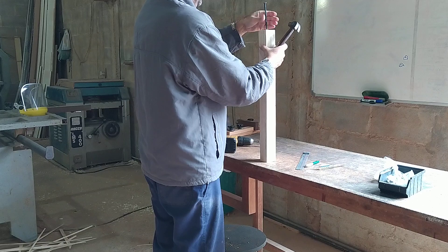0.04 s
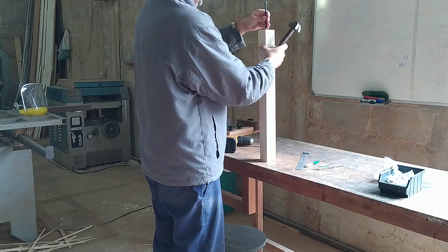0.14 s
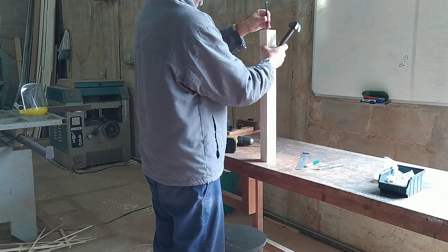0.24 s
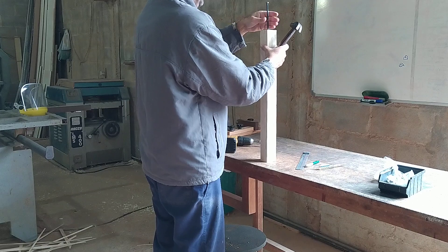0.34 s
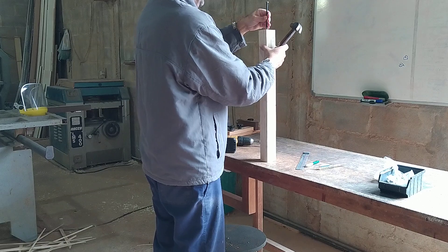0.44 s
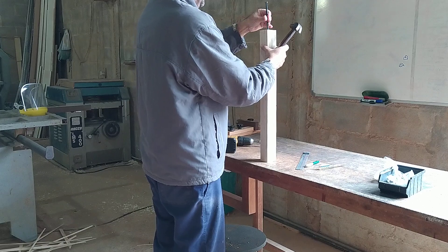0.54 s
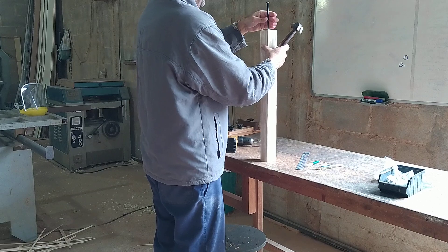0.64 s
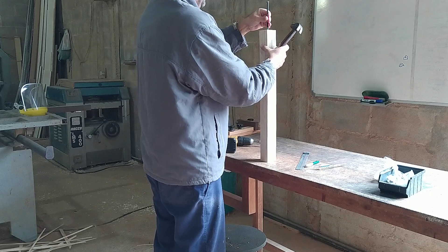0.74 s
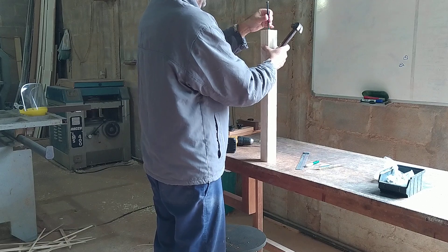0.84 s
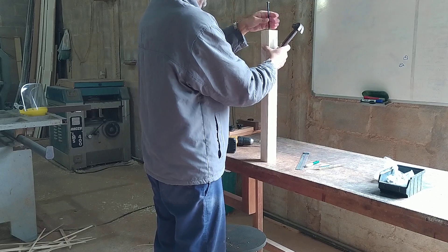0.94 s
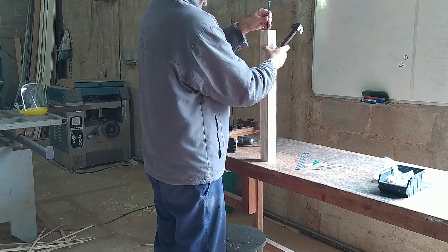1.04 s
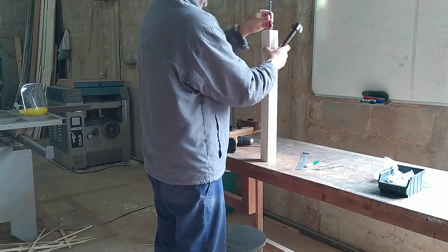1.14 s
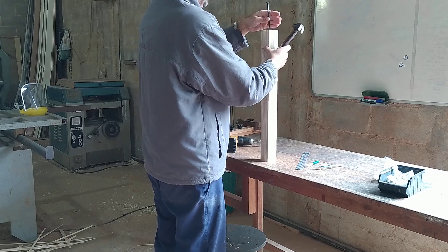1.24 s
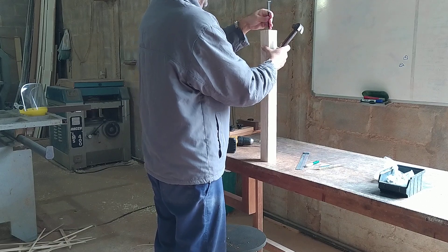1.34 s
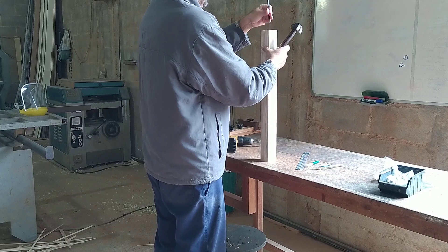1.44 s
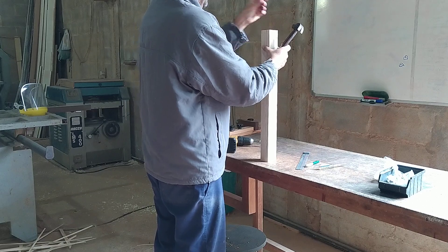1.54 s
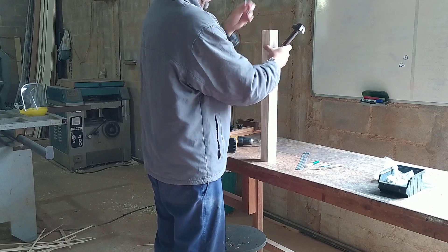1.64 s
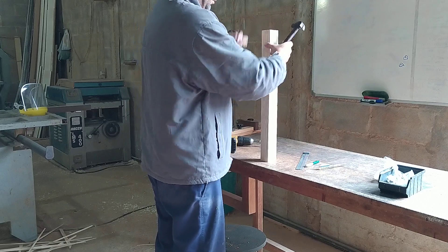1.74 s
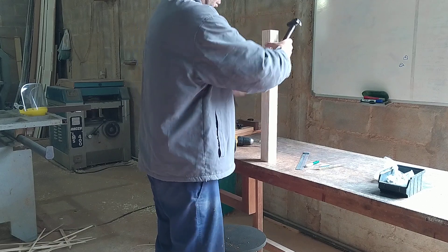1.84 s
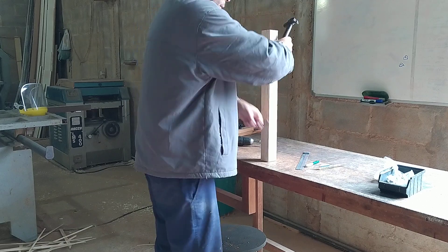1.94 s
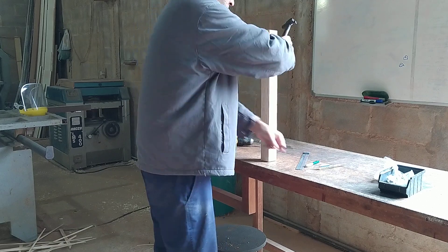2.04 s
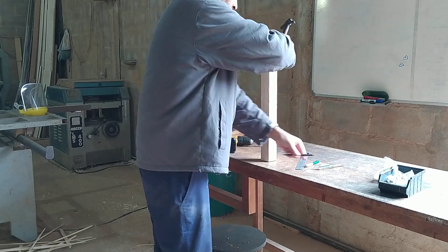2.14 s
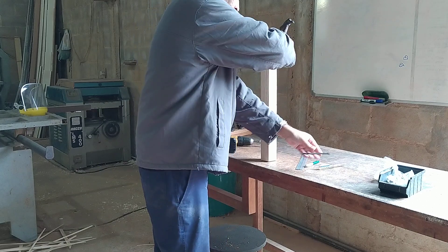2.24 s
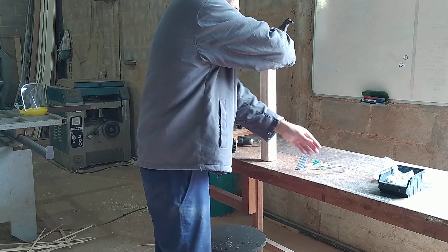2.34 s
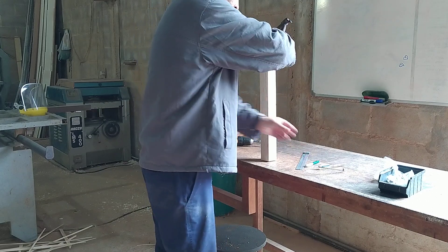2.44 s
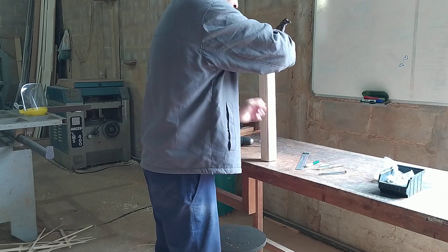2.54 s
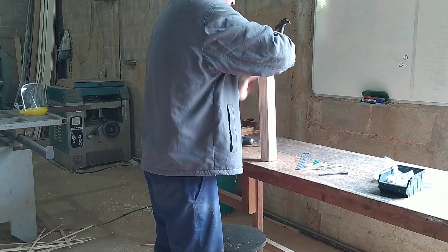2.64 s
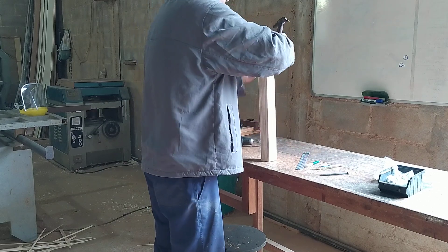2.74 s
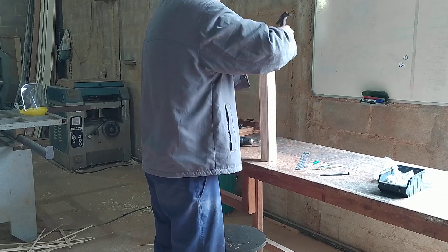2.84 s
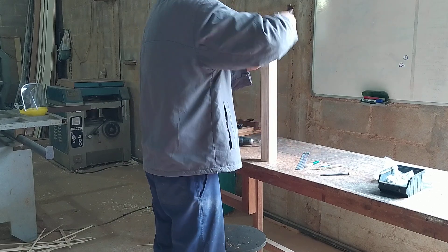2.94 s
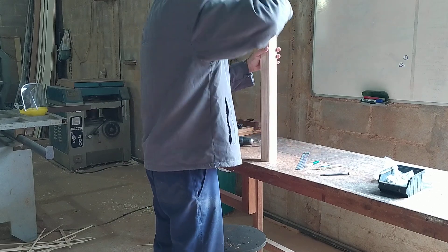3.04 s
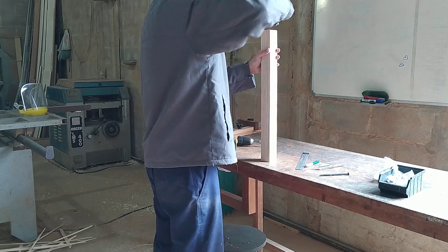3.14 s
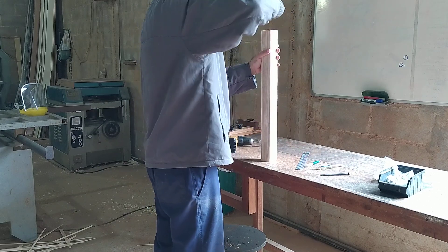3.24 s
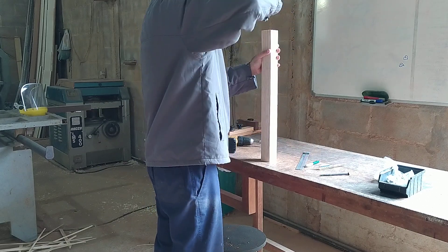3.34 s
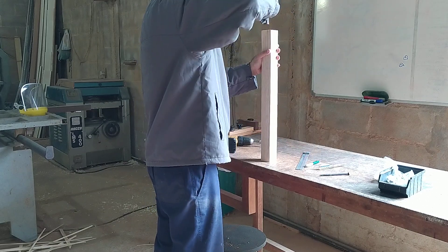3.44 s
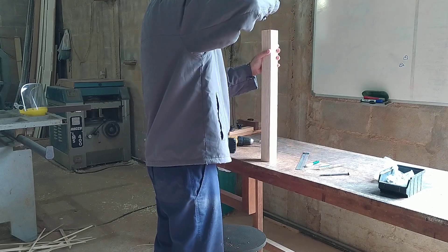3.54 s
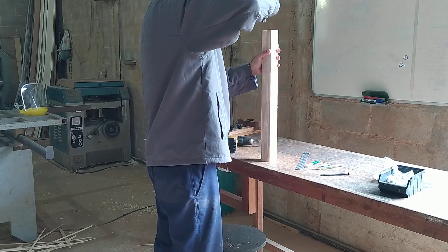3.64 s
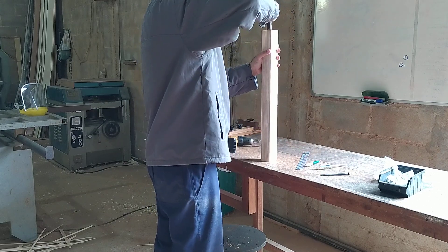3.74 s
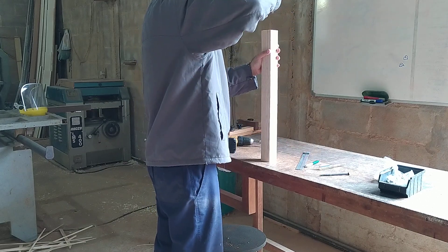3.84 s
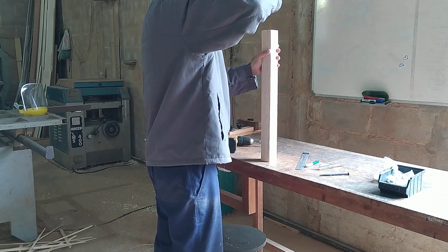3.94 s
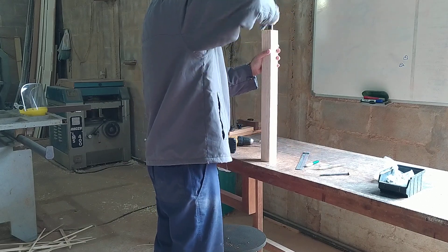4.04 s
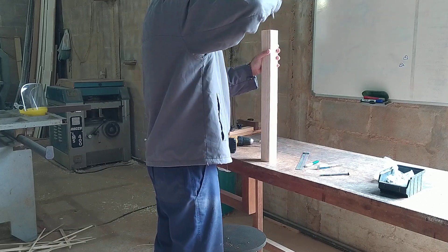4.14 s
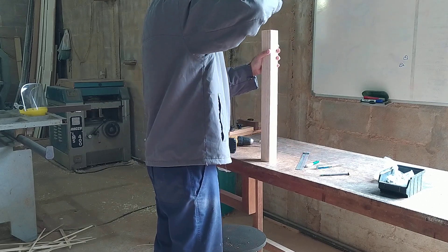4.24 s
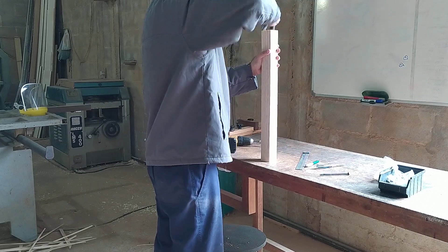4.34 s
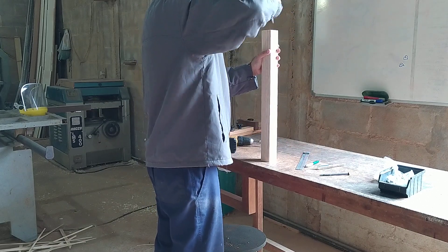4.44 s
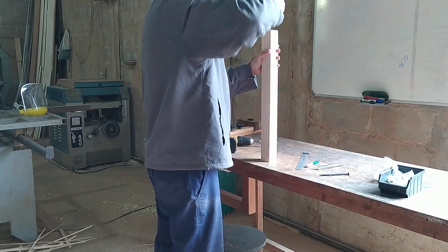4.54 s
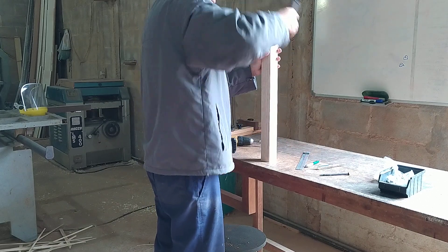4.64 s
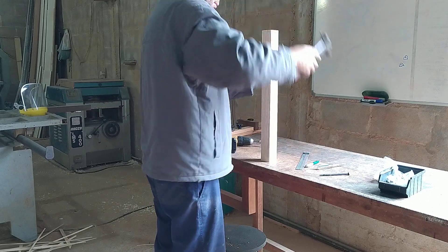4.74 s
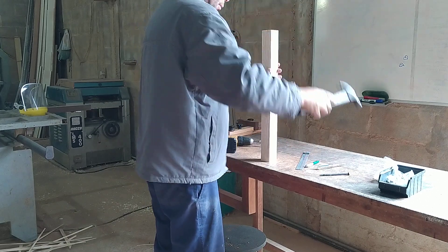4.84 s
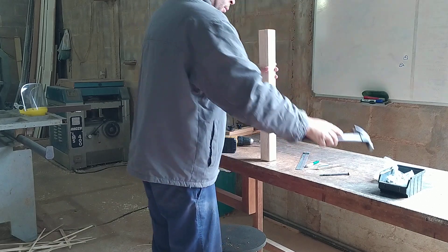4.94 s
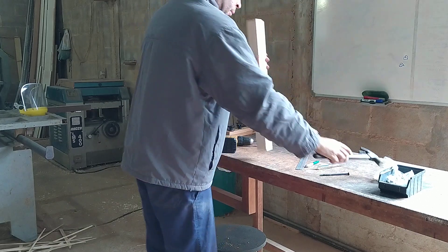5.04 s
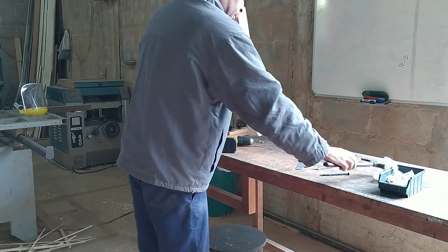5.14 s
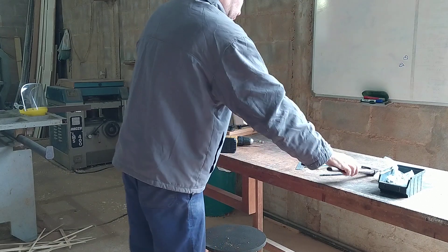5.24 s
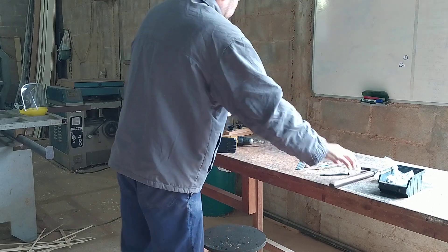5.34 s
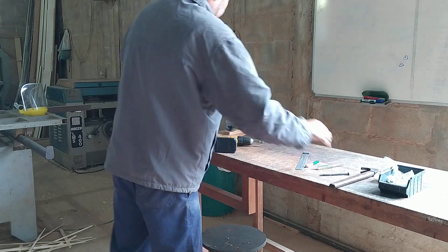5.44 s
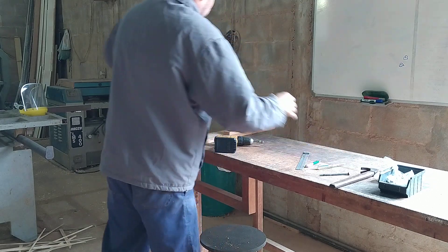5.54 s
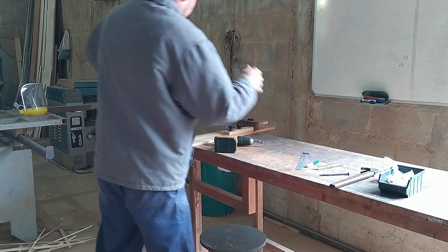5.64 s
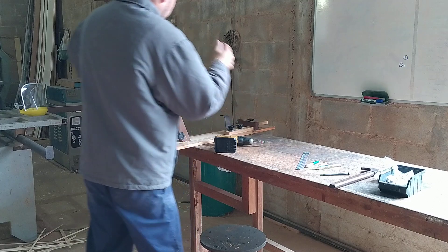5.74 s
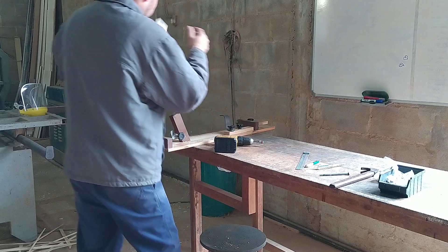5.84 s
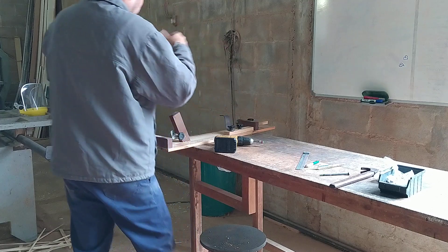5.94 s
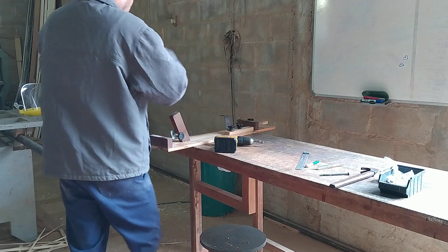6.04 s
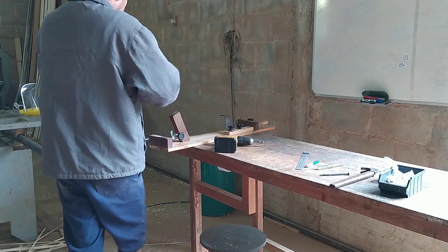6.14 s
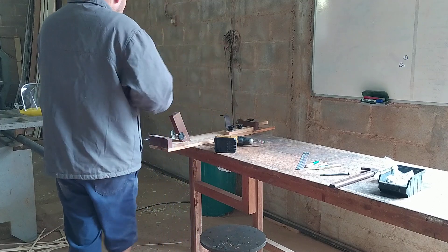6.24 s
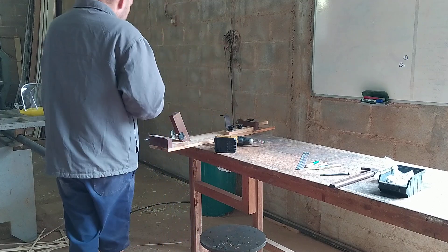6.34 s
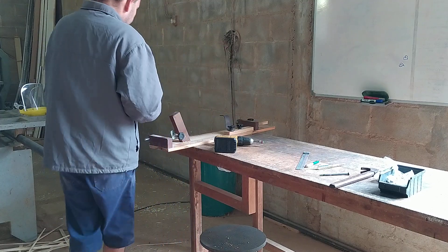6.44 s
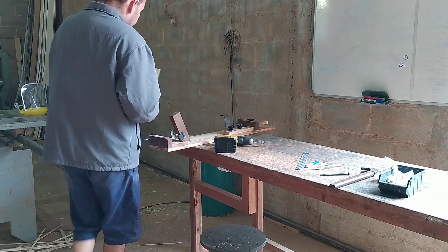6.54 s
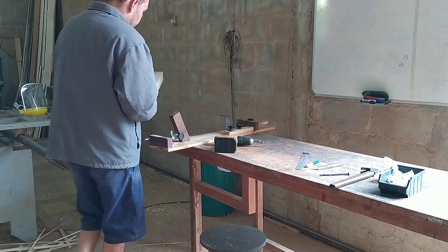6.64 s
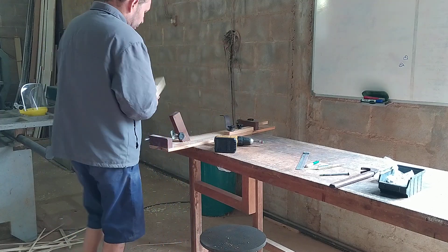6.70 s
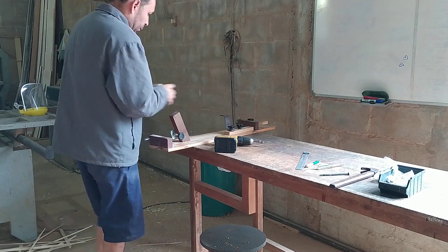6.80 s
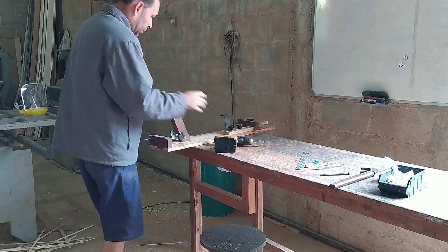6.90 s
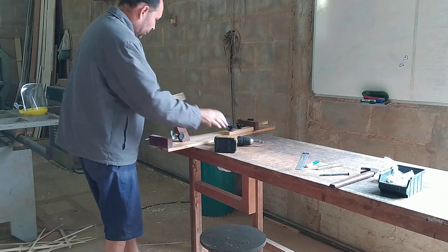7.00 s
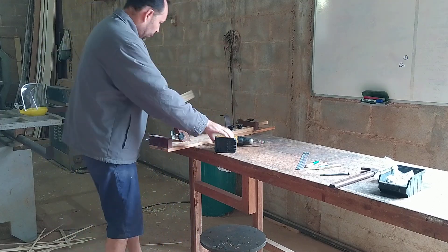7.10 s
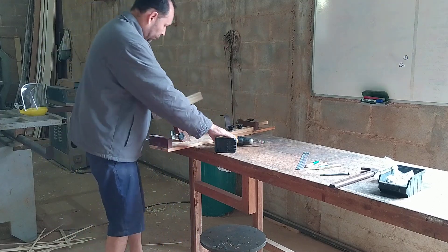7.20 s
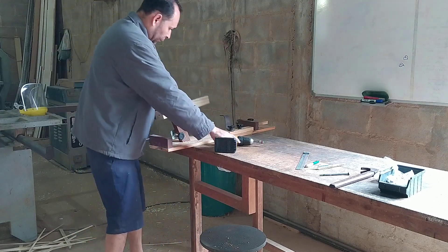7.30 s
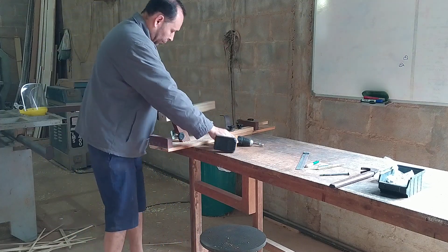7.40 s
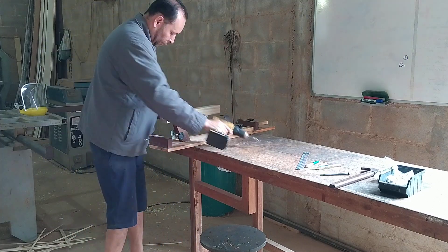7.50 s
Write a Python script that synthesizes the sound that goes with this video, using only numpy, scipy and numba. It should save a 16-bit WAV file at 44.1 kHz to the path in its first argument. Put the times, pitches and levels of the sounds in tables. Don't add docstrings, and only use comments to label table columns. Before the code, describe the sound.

A hard-walled workshop with just over half a second of echo, heard by a phone a few metres away over low town rumble and a distant engine drone. From 0.2 to 1.4 seconds a thin steel point wiggled in wood gives small irregular ticks, with soft jacket rustle at the start. At 2.4 it drops on the bench, bouncing until about 2.65 with a high, shimmering ring. Soft dull knocks follow at 2.9 to 3.2. Three loud hammer blows land at 3.8, 4.1 and 4.4, the first weaker: woody post thuds with bright steel ringing, slightly squashed. The hammer is laid down, handle at 5.3, heavy head at 5.4. Small jacket snaps come at 5.8 and 5.9, then a sharp cloth tug at 6.35. From 5.6 a motorbike outside swells and rises in pitch with hiss until the end. Tools knock at 6.6 and, brighter, 7.5.

```python
import sys
import numpy as np
from scipy import signal
from scipy.fft import rfft, irfft, next_fast_len
from scipy.io import wavfile
from scipy.ndimage import uniform_filter1d, minimum_filter1d
from numba import njit

SR = 44100
rng = np.random.default_rng(int(sys.argv[2]) if len(sys.argv) > 2 else 0)


def amplitude_ratio(level_db):
    exponent = np.asarray(level_db, float) / 20
    return 10 ** exponent


def wav_record(signal):
    frames = np.transpose(np.atleast_2d(signal))
    bounded = np.clip(frames, -1, 1)
    quanta = np.round(bounded * 32767).astype(np.int16)
    wavfile.write(sys.argv[1], SR, quanta)


N = 333717
TIME = np.arange(N) / SR
FAST = next_fast_len(N, real=True)
STREET_LEAD_SAMPLES, BENCH_LEAD_SAMPLES = 19, 10


def on_log(table, hz):
    f, value = np.transpose(table)
    return np.interp(np.log(np.maximum(hz, 1)), np.log(f), value)


def unit(x):
    return x / np.sqrt(np.mean(x ** 2))


def coloured(x, table):
    hz = np.arange(FAST // 2 + 1) * SR / FAST
    return irfft(rfft(x, FAST) * amplitude_ratio(on_log(table, hz)), FAST)[:, :N]


def band(x, hz, width_hz):
    return signal.lfilter(*signal.iirpeak(hz, hz / width_hz, SR), x)


def octave_share(hz, centre_hz):
    return np.clip(1 - np.abs(np.log2(np.maximum(hz, 1) / centre_hz)), 0, 1)


def walk(rate_hz, size=N):
    hold = int(SR / rate_hz)
    steps = np.repeat(rng.standard_normal(size // hold + 1), hold)
    return 1.3 * uniform_filter1d(uniform_filter1d(steps, hold), hold)[:size]


# frequency in Hz, left-right correlation.
PORT_LIKENESS = [(30, 0.5), (70, 0.8), (120, 0.92), (250, 1), (650, 0.95), (1000, 0.262), (4000, 0.076),
                 (10000, 0.081)]


def pair(size):
    n = next_fast_len(size, real=True)
    mid, side = rfft(rng.standard_normal((2, n)))
    like = np.clip(on_log(PORT_LIKENESS, np.arange(n // 2 + 1) * SR / n), 0, 1)
    sign = np.array([[1], [-1]])
    return irfft(np.sqrt(1 + like) * mid + np.sqrt(1 - like) * side * sign, n)[:, :size] / np.sqrt(2)


# frequency in Hz, T60 in seconds.
ROOM_T60 = [(100, 0.634), (400, 0.5232), (1500, 0.558), (4000, 0.3976), (6300, 0.32), (9500, 0.353),
            (14000, 0.4276)]


def room(direct_db, build_s, lead_samples):
    n = 2 ** 15
    t, hz = np.arange(n) / SR, np.arange(n // 2 + 1) * SR / n
    echoes, tail = rfft(pair(n)), 0
    for centre_hz in 62.5 * 2. ** np.arange(9):
        octave = irfft(echoes * octave_share(hz, centre_hz), n)
        tail = tail + octave * amplitude_ratio(-60 * t / on_log(ROOM_T60, centre_hz))
    tail = tail * (1 - np.exp(-t / build_s)) * (1 + 0.614 * np.exp(-t / 0.0096))
    tail = tail / np.sqrt(np.sum(tail ** 2) / 2)
    tail[:, 0] = amplitude_ratio(direct_db)
    tail[1] = np.roll(tail[1], lead_samples)
    return tail


def causal(table):
    n = 2048
    cepstrum = irfft(np.log(amplitude_ratio(on_log(table, np.arange(n // 2 + 1) * SR / n))), n)
    cepstrum[1:n // 2] *= 2
    cepstrum[n // 2 + 1:] = 0
    response = irfft(np.exp(rfft(cepstrum)), n)
    return response / np.sqrt(np.sum(response ** 2))


def hits(events, colour, modes, ring_db, crack_s, gain_db, direct_db, build_s):
    path = room(direct_db, build_s, BENCH_LEAD_SAMPLES)
    out, n = np.zeros((2, N)), 4096
    for s, db, bright_db, pan_db in events:
        crackle = rfft(rng.standard_normal(256) * np.exp(-np.arange(256) / SR / crack_s))
        push = np.pad(irfft(crackle / np.abs(crackle)), (0, n))
        soft = signal.lfilter([.2], [1, -.8], push)
        push = soft + amplitude_ratio(bright_db) * (push - soft)
        push = signal.fftconvolve(push, causal(colour))[:n]
        ring = sum(amplitude_ratio(mode_db) * band(push, hz, width_hz) for hz, width_hz, mode_db in modes)
        body = push + amplitude_ratio(ring_db) * ring
        level = amplitude_ratio(db + gain_db + np.array([[pan_db], [-pan_db]]) / 2)
        heard = signal.fftconvolve(body[None], path, axes=1) * level
        i = int((s - .002) * SR)
        out[:, i:i + heard.shape[1]] += heard[:, :N - i]
    return out


# centre in Hz, width in Hz, level in dB.
SHED_HUMS = [(103.45, 16.3, -67.5), (163.3, 15.5, -65), (273.9, 26.5, -62), (13600, 4000, -81.5)]


def shed():
    air = pair(N)
    out = 0
    for hz, width_hz, db in SHED_HUMS:
        hum = unit(band(band(air, hz, width_hz), hz, width_hz))
        out = out + amplitude_ratio(db + 1.77 * walk(4.3)) * hum
    return out


# time in seconds, pitch in Hz, level in dB.
DRONE = [(0, 56, -55), (.85, 55.83, -54), (1.1, 55.44, -71.5), (1.6, 52.61, -60.5), (2.09, 52.21, -54),
         (2.55, 51.3, -73), (2.8, 50.77, -61), (3.54, 50.62, -43), (3.9, 50.08, -50.5), (4.4, 48.29, -50),
         (4.9, 49.31, -51), (5.7, 48.92, -56), (6.3, 49.37, -57), (6.8, 48.4, -59.5), (7.57, 49.2, -58)]
# multiple of the pitch, level over the drone in dB.
DRONE_WHINE = [(9, -24), (12, -21)]
OCTAVE_DB, OCTAVE_FADE_DB_S = -57, 6


def drone():
    s, *columns = np.transpose(DRONE)
    hz, db = (np.interp(TIME, s, c) for c in columns)
    angle = 2 * np.pi * np.cumsum(hz * (1 + 0.01997 * walk(12))) / SR
    out = np.sqrt(2) * amplitude_ratio(db + 2.7 * walk(12)) * np.sin(angle)
    out = out + amplitude_ratio(OCTAVE_DB - OCTAVE_FADE_DB_S * TIME) * np.sin(2 * angle)
    for k, whine_db in DRONE_WHINE:
        out = out + amplitude_ratio(db + whine_db + 3.1 * walk(9.7)) * np.sin(k * angle)
    return out


# time in seconds, level in dB, treble lift in dB as traffic nears.
WASH = [(0, -54, -3), (.7, -54.5, 1.5), (1.1, -56, -0.5), (1.5, -57, 2.5), (2.38, -56.5, -2.5),
        (2.9, -55.5, -2), (3.25, -53, 0.5), (3.76, -55.5, 0.5), (5.1, -52, 3), (5.8, -53, 8.5),
        (6.7, -54.5, 10), (7.45, -53.5, 14.5)]
# frequency in Hz, density in dB per Hz.
WASH_COLOUR = [(12, -39.5), (20, -4), (53, -10.5), (127, -20), (163, -13), (367, -15.5), (399, -11.5),
               (513, -13.5), (558, -16.5), (607, -12.5), (698, -15.5), (1860, -18), (2900, -22.5),
               (3450, -28.5), (5800, -29.5), (6300, -31.5), (9400, -30), (11500, -42), (14500, -51),
               (16000, -61.5)]


def wash():
    s, *columns = np.transpose(WASH)
    wash_db, lift_db = (np.interp(TIME, s, c) for c in columns)
    noise, out = rfft(unit(coloured(pair(N), WASH_COLOUR)), FAST), 0
    hz = np.arange(len(noise[0])) * SR / FAST
    for centre_hz in 22 * 2. ** np.arange(10):
        near = np.clip(np.log2(centre_hz / 1100) / 2.27, -.15, 1)
        octave = irfft(noise * octave_share(hz, centre_hz), FAST)[:, :N]
        out = out + octave * amplitude_ratio(wash_db + near * (lift_db - 4.5) + 1.365 * walk(11))
    out[1] = np.roll(out[1], STREET_LEAD_SAMPLES)
    return amplitude_ratio(6) * out


# time in seconds, firing rate in Hz, level in dB.
BIKE = [
    (5.601, 34.72, -58),
    (5.862, 35.7, -49.5),
    (6.06, 38.22, -47),
    (6.413, 40.73, -46),
    (6.744, 44.81, -43),
    (6.906, 45.22, -45),
    (7.079, 46.76, -42.5),
    (7.231, 49.29, -44.5),
    (7.456, 51.35, -44),
]
# centre in Hz, width in Hz, gain in dB.
EXHAUST = [(95.8, 117, -4), (156, 41, -25.5), (269.6, 79.3, 3), (372.2, 28.2, 3), (398, 87, -3.5),
           (856, 174, -0.5)]
# centre in Hz, width in Hz, gain in dB.
STREET = [(83.3, 43, -6), (121.2, 23, -8.5), (235, 35.8, -5.5), (264.8, 13.6, 1.5), (284, 9.1, -10),
          (335.5, 14.9, -2), (356.6, 9.1, 1), (393.9, 18.3, -1), (437.2, 18.3, -9)]
ORDERS_DB = [-1, -3, -10.5, -2.5, -26, -0.5, 0, -16, -0.5]
TYRES_DB, TYRES_RISE_DB_S = -49, 6


def bike():
    s, *columns = np.transpose(BIKE)
    t = TIME[5 * SR:]
    n = len(t)
    hz, db = (np.interp(t, s, c) for c in columns)
    turns = np.cumsum(hz * (1 + .004 * walk(30, n))) / SR

    pulses = np.diff(np.floor(turns), prepend=0) * amplitude_ratio(0.79 * rng.standard_normal(n))
    pipe = 0
    for k, (f, width_hz, g) in enumerate(EXHAUST):
        pipe = pipe + (-1) ** k * amplitude_ratio(g) * band(band(pulses, f, width_hz), f, 2 * width_hz)
    path = room(1.1, 0.0129, STREET_LEAD_SAMPLES)
    pipe = signal.fftconvolve(pipe[None], path, axes=1)[:, :n]

    lines = 0
    for k, g in enumerate(ORDERS_DB, 2):
        favour = sum(amplitude_ratio(d) / (1 + (2 * (k * hz - f) / width_hz) ** 2) for f, width_hz, d in STREET)
        lines = lines + amplitude_ratio(g + 3.5 * walk(8.085, n)) * favour * np.sin(2 * np.pi * k * turns)

    tyres = band(band(pair(n), 2790.0, 1340.0), 2960.0, 1800.0)
    gas = band(band(pair(n), 8670.0, 3000.), 5880.0, 2600.0)
    hiss = tyres + amplitude_ratio(-6.5) * gas
    hiss[1] = np.roll(hiss[1], STREET_LEAD_SAMPLES)
    hiss_db = TYRES_DB + TYRES_RISE_DB_S * (t - s[1]) - 60 * np.maximum(s[1] - .08 - t, 0)

    fade = np.clip((t - s[0] + .1) / 0.17, 0, 1)
    out = fade * (unit(pipe) * amplitude_ratio(db - 2) + lines * amplitude_ratio(db - 4.0) + unit(hiss) * amplitude_ratio(hiss_db - 6.0))
    return np.pad(out, ((0, 0), (N - n, 0)))


# peak in seconds, level in dB, seconds to rise 20 dB, seconds to fall 20 dB.
RUBS = [
    (.07, -56, -0.5, 0.36),
    (.36, -56.5, 0.12, 0.54),
    (2.258, -58.5, 0.91, 1.64),
    (6.35, -38.5, 0.0045, 0.22),
]
# frequency in Hz, density in dB per Hz.
CLOTH_COLOUR = [(710, -6), (1200, -1), (1910, 1), (3010, -1.5), (5470, -5.5), (9110, 2.5), (11600, -13),
                (16000, -17.5)]


def cloth():
    gain = 0
    for s, db, rise_s, fall_s in RUBS:
        gain = gain + amplitude_ratio(db - 20 * np.maximum((s - TIME) / rise_s, (TIME - s) / fall_s))
    grain = unit(coloured(pair(N), CLOTH_COLOUR)) * amplitude_ratio(0.48 * walk(62))
    return grain * uniform_filter1d(gain, size=900)


# time in seconds, strength in dB, brightness in dB, left minus right in dB.
SNAPS = [
    (5.7814, -25.5, 2, -0.5),
    (5.7906, -34, 0, 2.5),
    (5.884, -27, 0.5, 1),
    (5.894, -45, -8.5, -5.5),
    (6.3465, -28.5, -5, 0),
]
# frequency in Hz, density in dB per Hz.
SNAP_COLOUR = [(590, -31.5), (1000, -8.5), (1420, -4.5), (1670, -3), (2410, -1), (6250, -14.5),
               (9280, -1.5), (12500, -13), (16000, -31)]


def snaps():
    return hits(SNAPS, SNAP_COLOUR, [], ring_db=0, crack_s=0.0004,
                gain_db=18.0, direct_db=-7, build_s=0.0006)


# time in seconds, strength in dB, brightness in dB, left minus right in dB.
KNOCKS = [(2.883, -35, -14, 1), (2.916, -44, -13.5, -1), (2.991, -37, -19, -1.5), (3.058, -47.5, -8, -3.5),
          (3.12, -42, -3.5, 0.5), (3.168, -41.5, -5.5, -0.5), (4.962, -59, 9.5, 0.5),
          (6.614, -35.5, -2.5, -1), (6.647, -43.5, -3, 0), (7.491, -29.5, 12, 2.5), (7.509, -30.5, 0, -9.5)]
# frequency in Hz, density in dB per Hz.
KNOCK_COLOUR = [(120, -40), (200, -16), (347, -2), (821, -10.5), (968, -2.5), (1080, -14.5), (1160, -9),
                (2290, -10), (5130, -30), (9400, -16.5), (16000, -41)]
# centre in Hz, width in Hz, gain in dB.
TOOL_MODES = [(968, 9.2, -15), (1268, 42.6, -4), (1622, 32, -11), (2360, 50, -22.5)]


def knocks():
    return hits(KNOCKS, KNOCK_COLOUR, TOOL_MODES, ring_db=12.5, crack_s=0.00061,
                gain_db=20.5, direct_db=-10.5, build_s=0.00112)


# time in seconds, strength in dB, brightness in dB, left minus right in dB.
TICKS = [(0.1688, -50.5, -6.5, -7.5), (0.1935, -39, -3, 0.5), (0.2534, -41, -7, 0.5),
         (0.3497, -40.5, -8, -1.5), (0.4738, -35, -17, 0), (0.631, -36.5, -8, 0.0), (0.7642, -35, -1.5, 0),
         (0.9258, -44.5, 3, -0.5), (1.0675, -31, 1, 0.5), (1.2392, -40, -16, -1.5), (1.378, -34.5, -8, 2.5),
         (1.4096, -39, -15, -7.5)]
# frequency in Hz, density in dB per Hz.
TICK_COLOUR = [(300, -12.5), (800, -2), (1400, -11.5), (2000, -19.5), (2600, -2), (4000, -15.5),
               (5500, -13.5), (7500, -7), (10000, -1.5), (13000, -27), (16000, -25)]
# centre in Hz, width in Hz, gain in dB.
POINT_MODES = [(2616, 36.5, 5.5), (3054, 140, -10.5), (3663, 133, 4.5), (3980, 52, 0), (5080, 70, 3),
               (6100, 132, -2.5), (7076, 310, -2), (8730, 85, -7), (10470, 320, -15)]


def ticks():
    return hits(TICKS, TICK_COLOUR, POINT_MODES, ring_db=8.0, crack_s=0.00038,
                gain_db=22.0, direct_db=-7.5, build_s=0.0021)


# time in seconds, strength in dB, brightness in dB, left minus right in dB.
BOUNCES = [(2.407, -8, -2.5, -0.5), (2.416, -1, 4, 0.5), (2.421, -9, 2, -2), (2.427, -9, 3, 0.5),
           (2.44, -16.5, 3.5, -1.5), (2.52, -15.5, 7, 0), (2.552, -12.5, 8.5, 1), (2.569, -19, 5.5, 0),
           (2.611, -12, 2, 1), (2.63, -26, 7, -3.5), (2.66, -29, -6, -3)]
# frequency in Hz, density in dB per Hz.
BOUNCE_COLOUR = [(59, -60), (100, -18.5), (724, -3.5), (794, -1.5), (1080, -1), (2920, -2.5), (4130, -13),
                 (4700, -11.5), (8000, -20), (9000, -28), (10400, -37), (17600, -120)]
# centre in Hz, width in Hz, gain in dB.
BENCH_MODES = [(276, 26, 5.5), (406, 81, -1), (533, 42, 2.5), (819, 37, 4.5), (960, 51, -16.5),
               (1200, 78, -12.5), (2866, 455, -7)]


def bounces():
    return hits(BOUNCES, BOUNCE_COLOUR, BENCH_MODES, ring_db=-11.5, crack_s=0.00089,
                gain_db=13, direct_db=-11.0, build_s=0.00152)


# time in seconds, strength in dB, brightness in dB, left minus right in dB.
GRAZES = [
    (2.538, -13, 0.5, 0),
    (2.555, -13.5, -1, 0.5),
]
# frequency in Hz, density in dB per Hz.
GRAZE_COLOUR = [(4000, -51), (8600, -25), (9100, 0.5), (10400, -3), (10900, -30.5), (16000, -69.5)]


def grazes():
    return hits(GRAZES, GRAZE_COLOUR, [], ring_db=0, crack_s=0.002,
                gain_db=-0.78, direct_db=-15.5, build_s=0.0036)


ROD_HZ = [4554, 8473, 13650]
# time in seconds, then level of each mode in dB.
FLIGHTS = [
    (2.416, -44, -21, -46.5),
    (2.452, -32, -20.5, -46.5),
    (2.52, -30.5, -20.5, -47.5),
    (2.553, -33, -18, -44),
    (2.588, -42, -28, -51),
    (2.611, -36.5, -23, -44),
    (2.662, -52.5, -24.5, -45),
]
# left port faced at seconds, depth 0-1, right port later by turns.
FACING = [
    (2.53, .45, 0.084),
    (2.565, 0.1, 0.13),
    (2.565, 0.25, 0.206),
]
LOBES = (1, 1, 2)
SETTLED_T60_S = [0.46, 0.242, 0.284]
SPIN_HZ, SETTLES_S, TAKE_UP_S = 5.72, 2.6182, .012


def rod():
    s, *dbs = np.transpose(FLIGHTS)
    i, n = 2 * SR, SR
    t = TIME[i:i + n]
    flight, out = np.searchsorted(s, t) - 1, 0
    for hz, db, lobes, (faces_s, depth, later), t60 in zip(ROD_HZ, dbs, LOBES, FACING, SETTLED_T60_S):
        dying_db = -60 * np.maximum(t - SETTLES_S, 0) / t60
        turn = lobes * SPIN_HZ * (t - faces_s) - later * np.array([[0], [1]])
        facing = np.abs(1 + np.clip(depth, 0, 1) * np.exp(2j * np.pi * turn))
        gain = (flight >= 0) * amplitude_ratio(db[flight] + dying_db + 1.04 * walk(55.1, n))
        gain = uniform_filter1d(gain, int(TAKE_UP_S * SR))
        phase = 2 * np.pi * hz * t + np.array([[0.], [1.3]]) + .3 * walk(25.5, n)
        out = out + gain * facing * amplitude_ratio(np.array([[-1.1], [1.1]])) * np.sin(phase)
    return np.pad(out, ((0, 0), (i, N - i - n)))


# time in seconds, strength in dB, brightness in dB, left minus right in dB.
HANDLE = [
    (5.2955, -10, 4, 2),
    (5.300, -2.5, -1, 2.5),
    (5.314, -15, -4.5, 0),
]
# frequency in Hz, density in dB per Hz.
HANDLE_COLOUR = [(35, -66.5), (60, -39), (207, -11.5), (281, -9), (540, -5.5), (749, -9), (991, -10.5),
                 (1200, -10), (1500, -11.5), (3100, -20.5), (3450, -32), (9350, -34), (13000, -43.5),
                 (16000, -110)]
# centre in Hz, width in Hz, gain in dB.
HANDLE_MODES = [(281, 23, 3.5), (413.8, 75, 1), (545, 38, 5), (830, 36.2, 4), (987, 50, -8.5),
                (1212, 63, -3), (1631, 60, -3.5), (1912, 40, -4), (2255, 50, -4.5), (2590, 110, -5),
                (2950, 380, -3)]


def handle_laid():
    return hits(HANDLE, HANDLE_COLOUR, HANDLE_MODES, ring_db=2.0, crack_s=0.00073,
                gain_db=23.5, direct_db=-12, build_s=0.00147)


# time in seconds, strength in dB, brightness in dB, left minus right in dB.
HEAD = [
    (5.4091, 0.005, 0.0066, 0.5),
    (5.4165, -1.1, 0.0089, -0.37),
]
# frequency in Hz, density in dB per Hz.
HEAD_COLOUR = [(35, -61), (60, -37.5), (268, -12.5), (389, -12), (540, -6.5), (1060, -19), (1250, -8),
               (2000, -9.5), (2520, -9), (4900, -17.5), (9130, -22.5), (10500, -29), (16000, -80)]
# centre in Hz, width in Hz, gain in dB.
HEAD_MODES = [(532, 46.4, -0.5), (1176, 120, -3.5), (1680, 98, -5.5), (2478, 220, 0), (2900, 300, -0.5),
              (4870, 305, -6.5)]


def head_laid():
    return hits(HEAD, HEAD_COLOUR, HEAD_MODES, ring_db=0.5, crack_s=0.00048,
                gain_db=21.0, direct_db=-13.5, build_s=0.00068)


# time in seconds, strength in dB, brightness in dB, left minus right in dB.
THUDS = [
    (3.787, -37, -2, -1.5),
    (4.095, -28.5, -0.5, 0),
    (4.387, -25, -5.5, -1.5),
]
# frequency in Hz, density in dB per Hz.
THUD_COLOUR = [(20, -11.5), (40, -23), (100, -4), (170, 0), (260, -18.5), (600, -52)]


def thuds():
    return hits(THUDS, THUD_COLOUR, [], ring_db=0, crack_s=0.00115,
                gain_db=35.5, direct_db=-6.5, build_s=0.00286)


# time in seconds, strength in dB, brightness in dB, left minus right in dB.
BLOWS = [
    (3.787, -4, 5, 0.5),
    (4.094, 1.5, 4, 0),
    (4.388, 0.5, 7.5, -0.5),
]
# frequency in Hz, density in dB per Hz.
BLOW_COLOUR = [(100, -44), (170, -17.5), (265, -3.5), (380, -7), (600, -3.5), (800, -2.5), (1200, -6),
               (1500, -9.5), (2000, -8.5), (3700, -14.5), (6000, -21.5), (9000, -18.5), (10500, -22),
               (11500, -36.5), (14000, -39.5), (16000, -52)]
# centre in Hz, width in Hz, gain in dB.
POST_MODES = [(290.4, 55.4, 0.5), (445.3, 19.6, 7), (523, 19.2, -0.5), (699, 27.6, -6), (820, 36, -1.5),
              (950.5, 28.2, -0.5), (1007, 21.7, -8.5), (1262, 19.5, -6), (1734, 51, -6), (1892, 21, -6),
              (2176, 20, -15.5), (3990, 100, -6)]
# centre in Hz, width in Hz, gain in dB.
HAMMER_MODES = [(5160, 36, -7), (8700, 60, -2), (9350, 44, 3), (10620, 58, -1), (11720, 39.4, 8.5),
                (12340, 32, 3), (13240, 36, 8), (14220, 40, 9), (15100, 50, 5.5)]


def blows():
    return hits(BLOWS, BLOW_COLOUR, POST_MODES + HAMMER_MODES, ring_db=2.0, crack_s=0.000695,
                gain_db=28, direct_db=-18, build_s=0.00258)


def scene():
    outside = shed() + drone() + wash() + bike()
    handling = cloth() + snaps() + knocks() + ticks()
    dropped_point = bounces() + grazes() + rod()
    hammer = handle_laid() + head_laid() + thuds() + blows()
    return outside + handling + dropped_point + hammer


@njit
def follow(size, attack, release):
    out, e = np.empty(len(size)), 0.
    for i in range(len(size)):
        e += (size[i] - e) * (attack if size[i] > e else release)
        out[i] = e
    return out


# frequency in Hz, depth in dB.
DROP_UNDER = [(3500, 35), (4500, 32), (6000, 32), (7500, 32), (8700, 36), (9200, 30), (10500, 31),
              (12000, 34), (16000, 39)]
TOP_HZ = 16200
GAPS_LOW_HZ, GAPS_HIGH_HZ, GAPS_OVER_DB = 3300, 8300, 6.2


def thin(x):
    hz, _, z = signal.stft(x, SR, "hann", 2048, 1024)
    power = np.sum(np.abs(z[:, :1024]) ** 2, axis=0).reshape(128, 8, -1).sum(axis=1)
    centre_hz = hz[4:1024:8, None]
    whim_db = 12 * uniform_filter1d(rng.standard_normal(power.shape), size=8, axis=1)
    below = np.cumsum(power * (centre_hz > 2000), axis=0)
    attack = below[-1] > 5 * minimum_filter1d(below[-1], size=2)
    keep = power > below * amplitude_ratio(whim_db - on_log(DROP_UNDER, centre_hz)) ** 2
    gap = (whim_db > GAPS_OVER_DB) | (np.roll(whim_db, 1, axis=0) > GAPS_OVER_DB + 1)
    gap = gap & (power < 1.5 * uniform_filter1d(power, size=7, axis=0))
    gap = gap & (centre_hz > GAPS_LOW_HZ) & (centre_hz < GAPS_HIGH_HZ)
    keep = keep & ~gap | attack
    z[:, :1024] *= np.repeat(keep & (centre_hz < TOP_HZ), 8, axis=0)
    return signal.istft(z, SR, "hann", 2048, 1024)[1][:, :N]


def band_limit(x):
    return signal.sosfilt(signal.butter(12, 16410, fs=SR, output="sos"), x)


def record(dry):
    attack_s, release_s, threshold_db = 0.00047, .06, -8.5
    loud = follow(np.abs(dry).max(axis=0), 1 / (attack_s * SR), 1 / (release_s * SR))
    gain = np.minimum(amplitude_ratio(threshold_db) / (loud + 1e-9), 1) ** 0.5893
    held = np.roll(dry, 30, axis=1) * gain
    rounded = np.tanh(0.819 * held) / 0.781
    mix = thin(rounded)
    return band_limit(mix)


dry = scene()
out = record(dry)
wav_record(out)
```